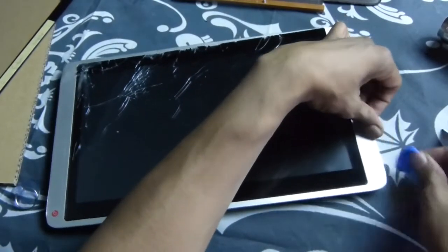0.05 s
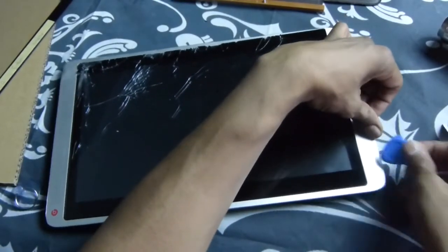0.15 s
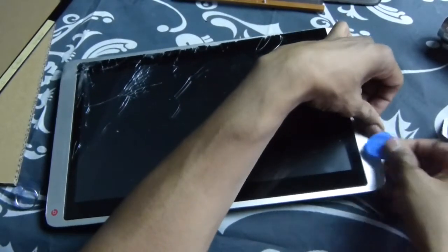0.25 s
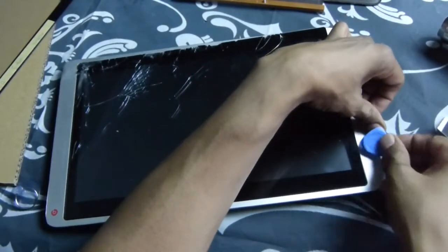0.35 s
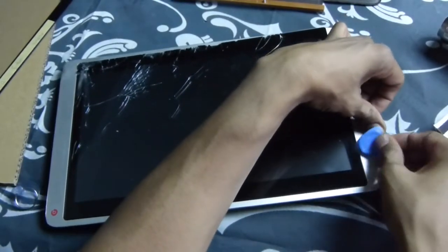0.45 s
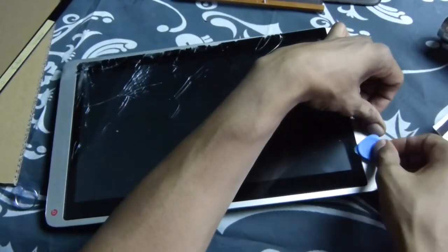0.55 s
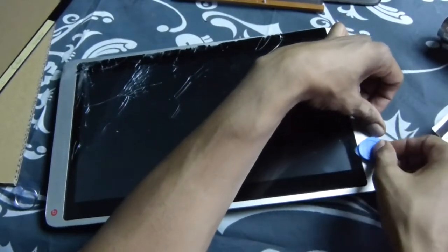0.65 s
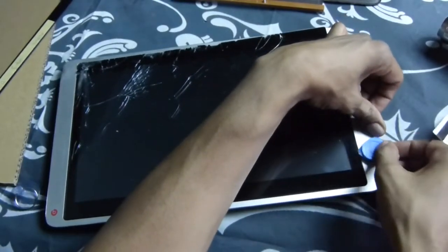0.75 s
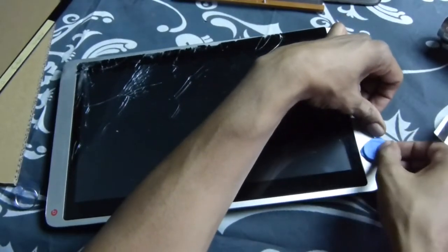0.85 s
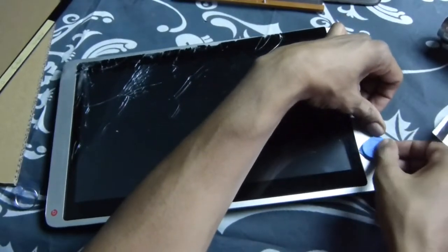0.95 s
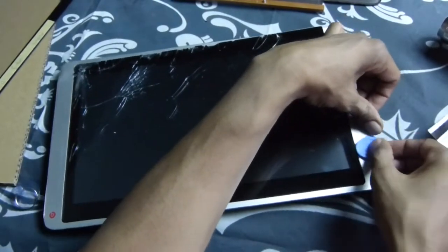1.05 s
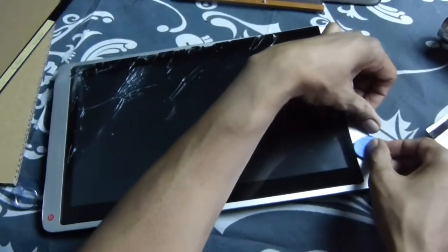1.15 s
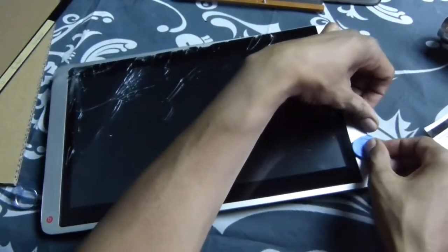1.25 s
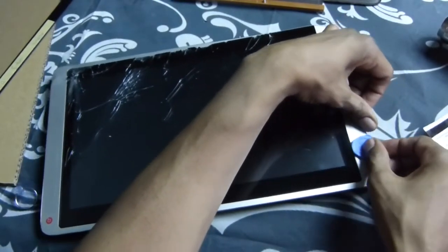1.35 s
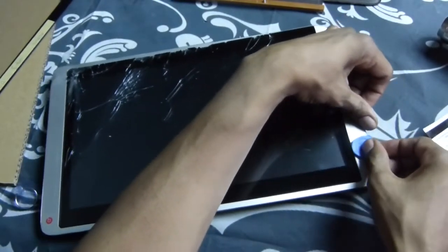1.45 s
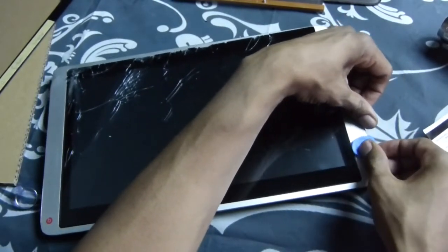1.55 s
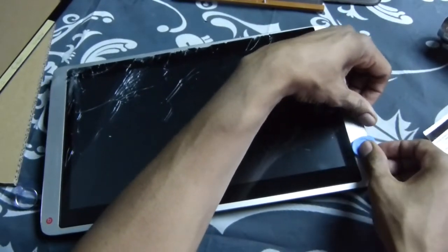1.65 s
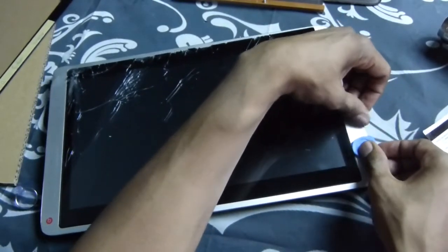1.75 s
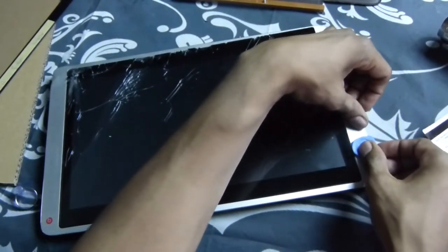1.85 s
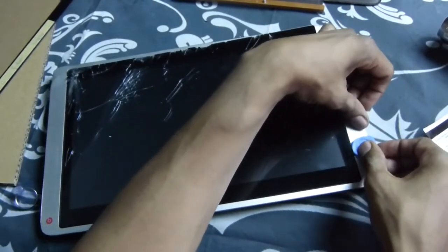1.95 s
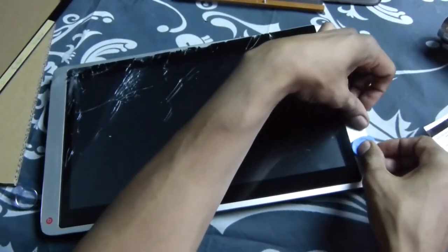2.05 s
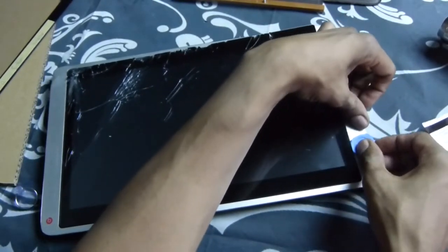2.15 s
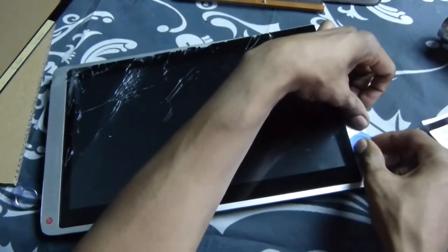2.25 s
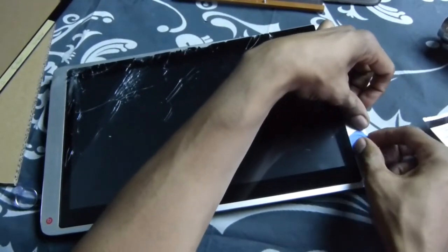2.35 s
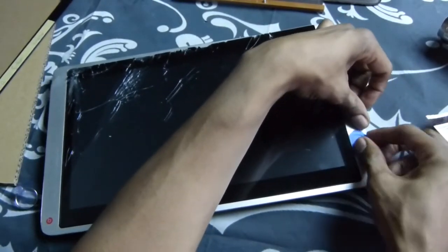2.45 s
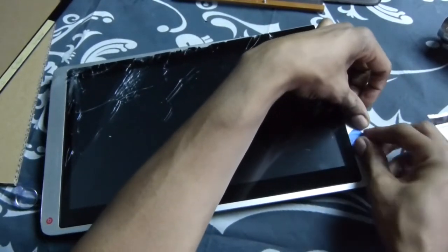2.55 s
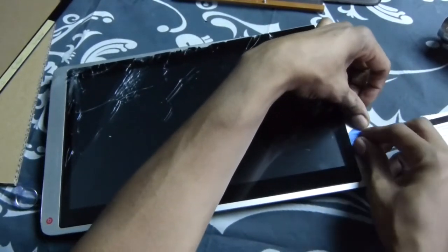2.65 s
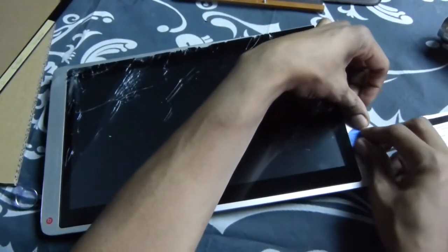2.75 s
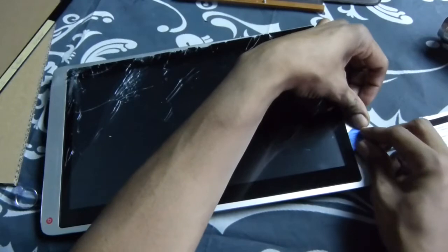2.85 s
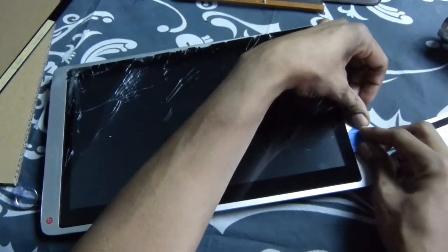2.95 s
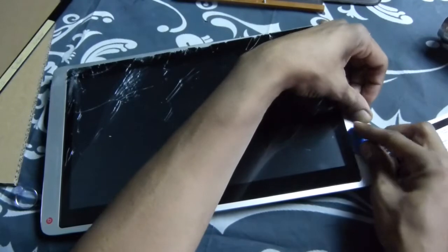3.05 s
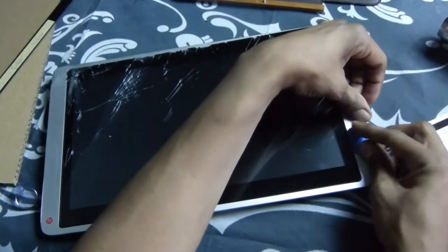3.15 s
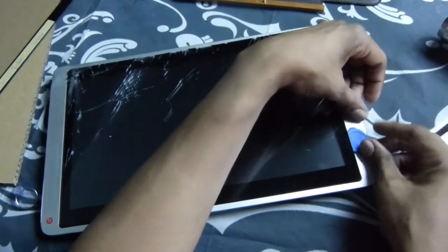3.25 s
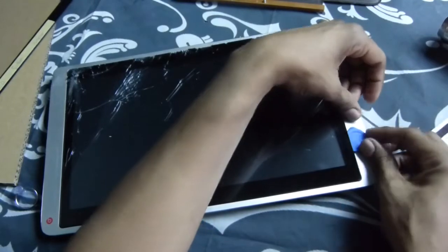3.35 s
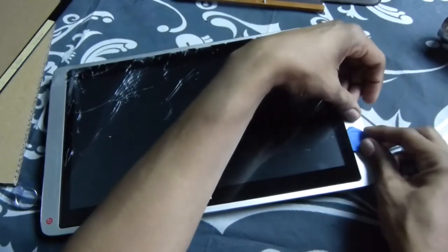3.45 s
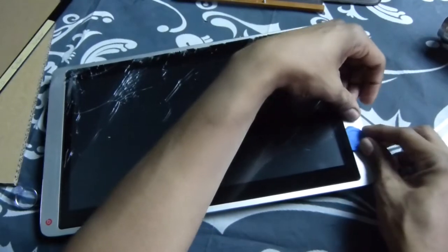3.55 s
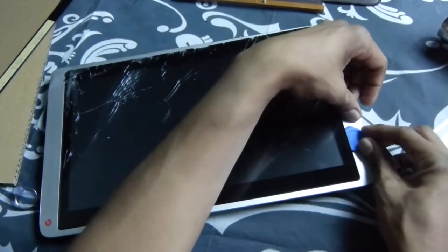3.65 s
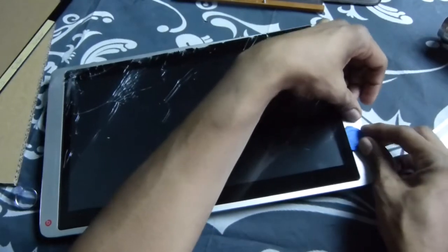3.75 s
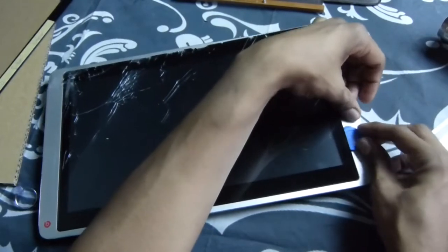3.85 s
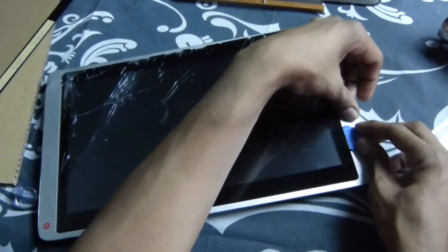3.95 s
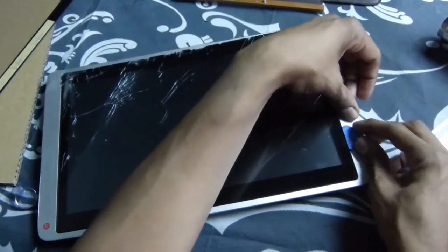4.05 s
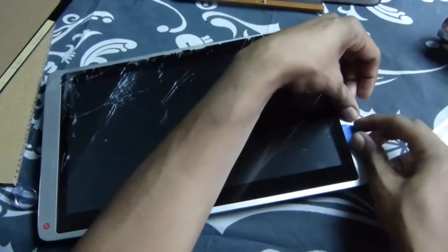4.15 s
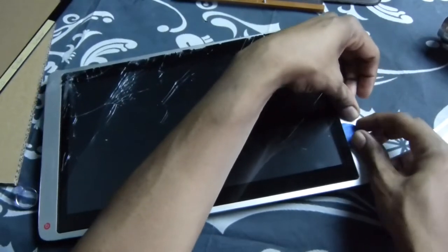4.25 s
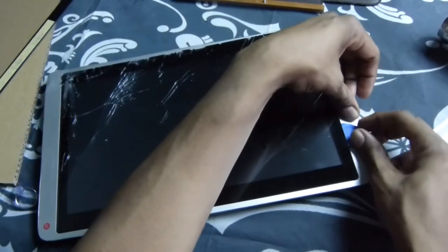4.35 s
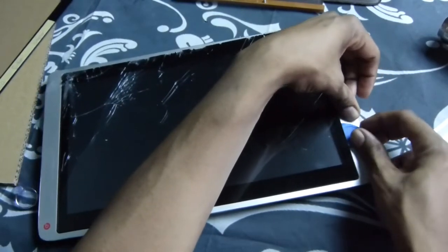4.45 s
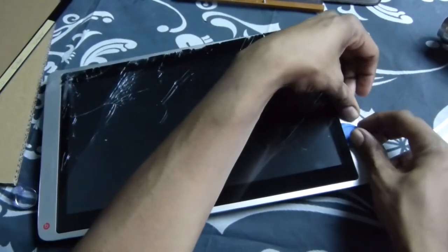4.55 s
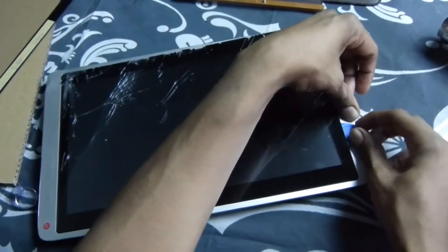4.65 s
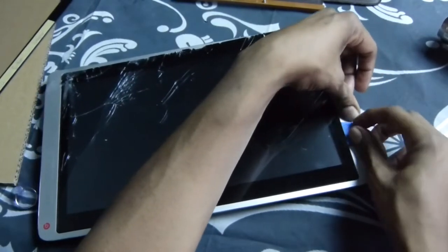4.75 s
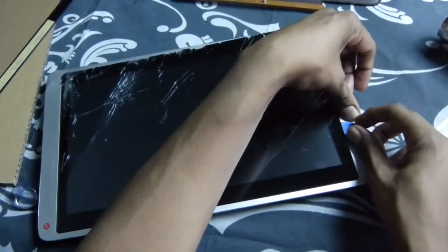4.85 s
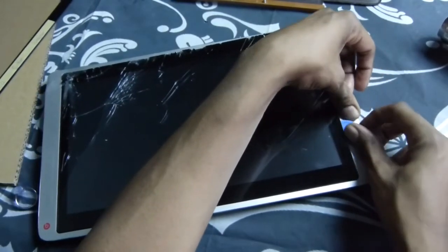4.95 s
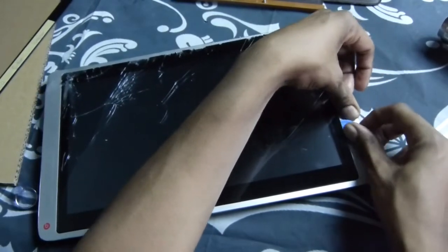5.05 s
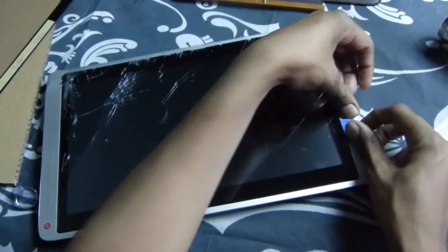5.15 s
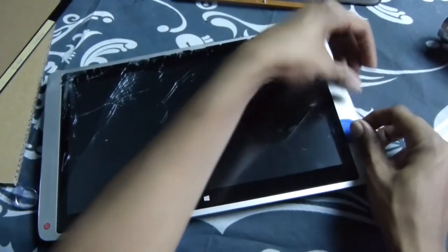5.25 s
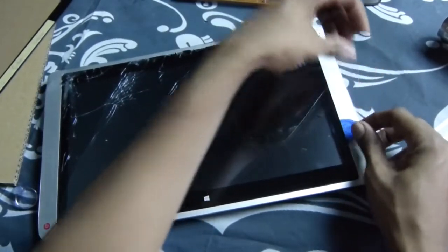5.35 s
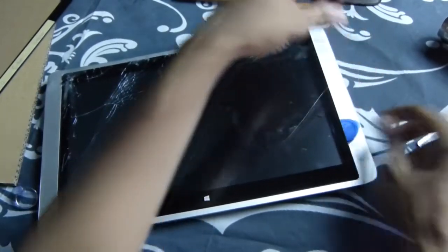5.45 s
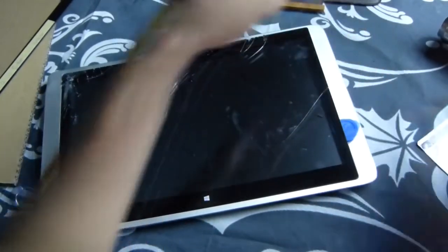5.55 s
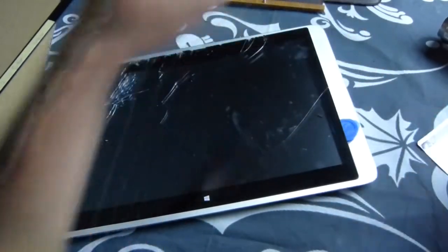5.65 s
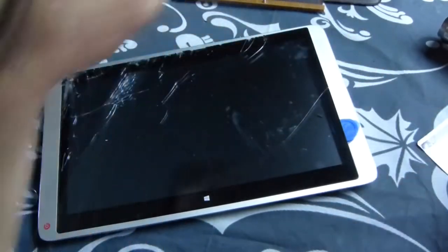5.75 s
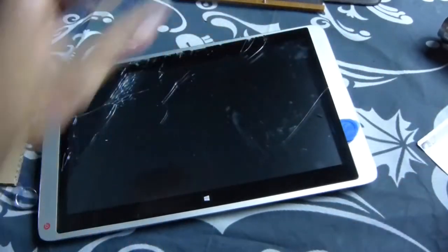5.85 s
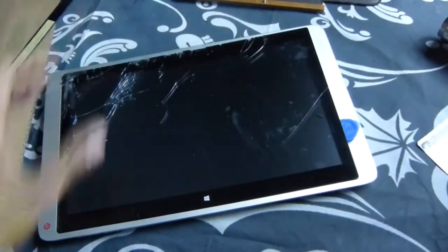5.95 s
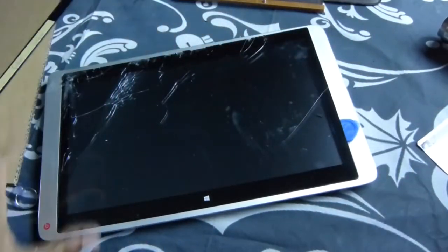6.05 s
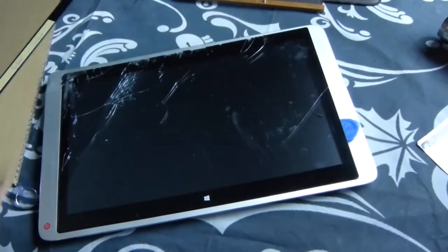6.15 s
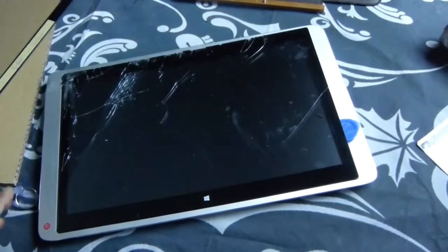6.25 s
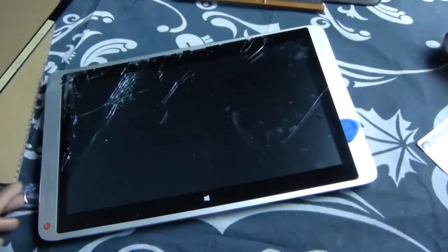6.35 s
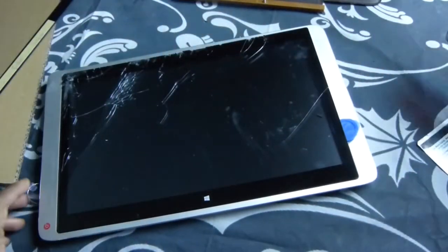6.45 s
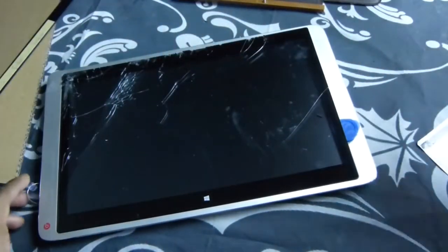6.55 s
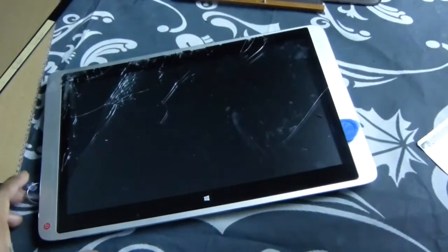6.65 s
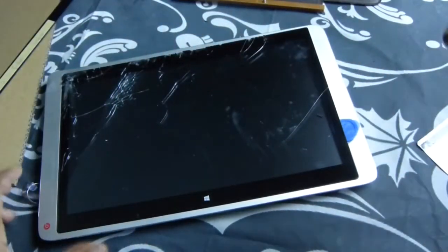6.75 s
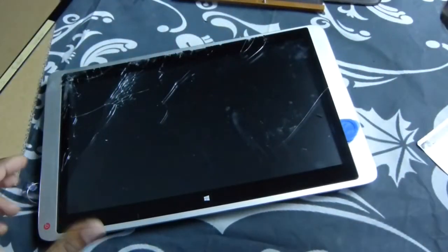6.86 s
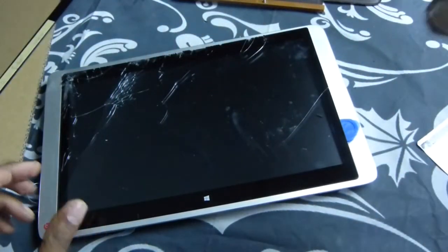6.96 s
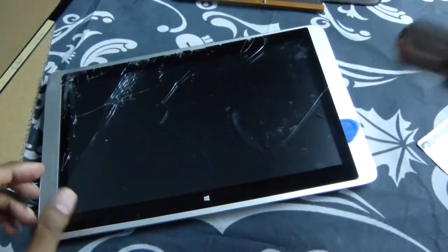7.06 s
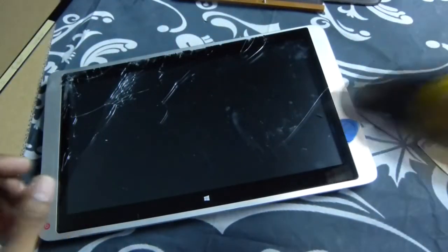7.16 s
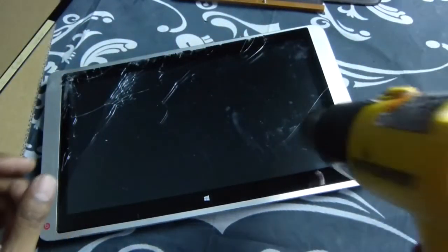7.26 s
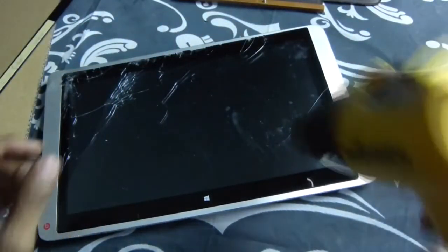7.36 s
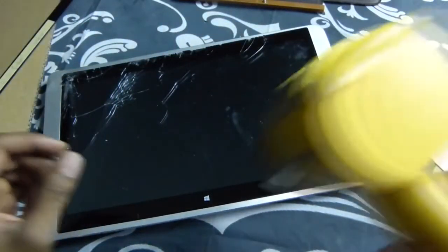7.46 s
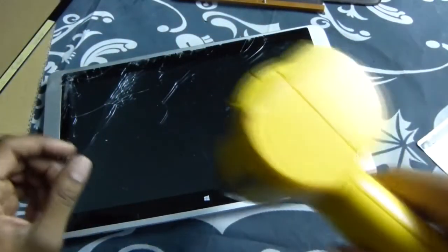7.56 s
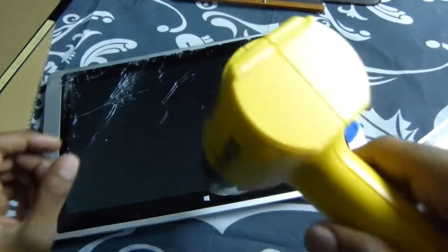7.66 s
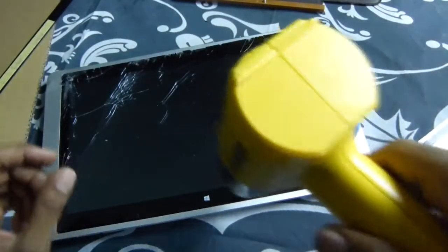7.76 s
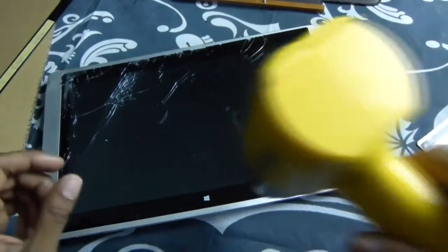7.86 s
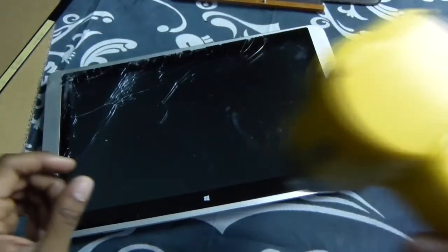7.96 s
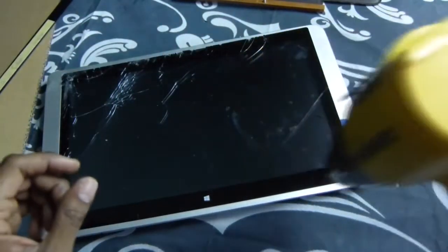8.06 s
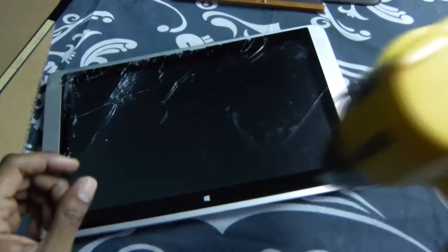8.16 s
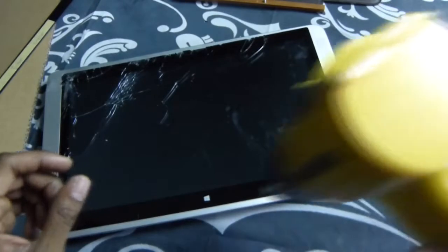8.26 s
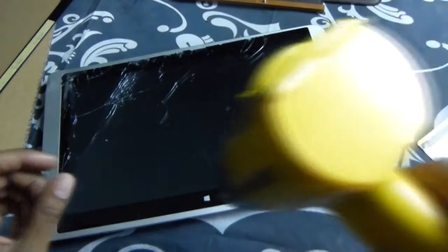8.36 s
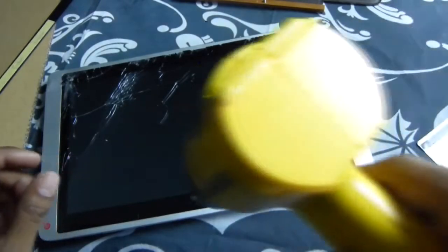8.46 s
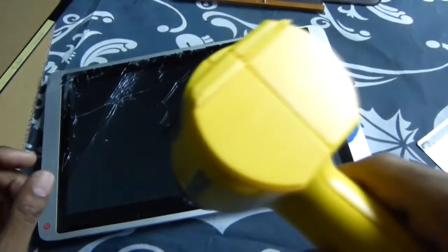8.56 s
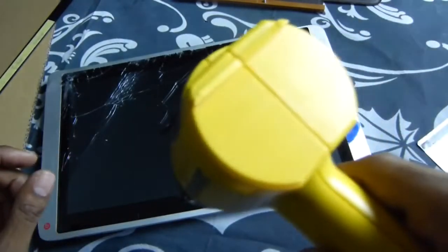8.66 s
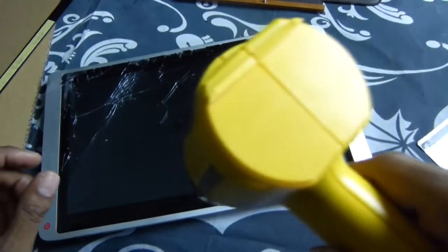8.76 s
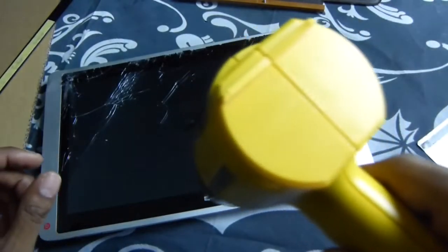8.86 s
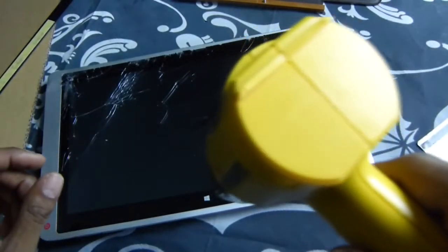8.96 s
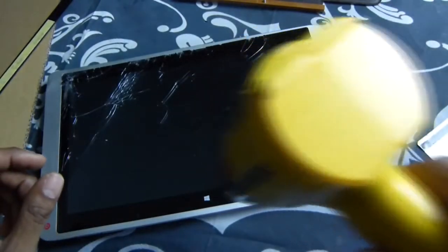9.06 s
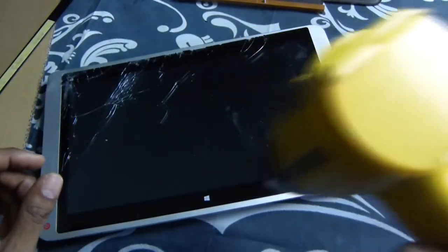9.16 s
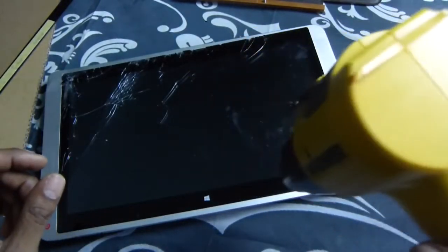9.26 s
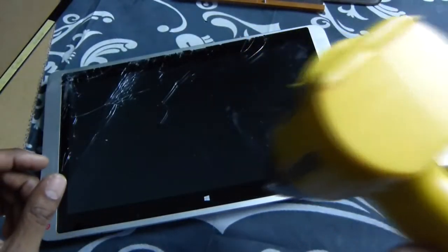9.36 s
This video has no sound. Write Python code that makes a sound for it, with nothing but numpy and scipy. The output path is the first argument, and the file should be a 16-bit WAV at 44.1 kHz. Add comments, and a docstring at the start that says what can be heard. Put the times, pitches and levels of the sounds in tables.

```python
"""Hands pry at a tablet's edge with a plastic pick in a small quiet room: dying noise bursts, coloured by
the struck body, make taps and snaps; grains of noise make rubbing, and sparse ticks make creaks.
Later knocks are duller and come from a metal tool and a heat gun being picked up. The gun is switched on
and swept over the glass: its fan's filtered noise roars through the casing resonances, and sine partials
on high multiples of the turning rate make the small motor whine."""
import sys
import numpy as np
from scipy import signal
from scipy.fft import rfft, irfft
from scipy.io import wavfile

SR = 44100
rng = np.random.default_rng(int(sys.argv[2]) if len(sys.argv) > 2 else 0)


def unload_audio(sound):
    """Save the sound as a 16-bit wav file, at the path given as the first command line argument."""
    columns = np.transpose(np.atleast_2d(sound))
    # keep every value between -1 and 1, then stretch to whole-number steps
    steps = np.round(np.clip(columns, -1, 1) * 32767)
    wavfile.write(sys.argv[1], SR, steps.astype(np.int16))


N = 414540

# the gun's sweep to and fro: start_s, position (0 = over the glass, 1 = out at the right edge)
SWEEP = [(7.5, 0.15), (7.65, 0.65), (7.92, 0.64), (8.1, 0.63), (8.36, 0.64), (8.5, 0), (8.9, 0.045),
         (9.12, 0.31), (9.36, 0.56)]
# spectrum of the air blast: frequency_hz, relative density_db (per Hz)
AIR_SPECTRUM = [(53, -89), (90, -28), (424, -16), (697, -5.5), (828, -10.5), (1120, -2), (1610, -11.5),
                (2590, -10), (3150, -20), (4350, -18), (5060, -14), (5630, -8), (6690, -16), (12500, -20),
                (15500, -34)]
# left-right likeness of air and rubbing: frequency_hz, correlation
NEAR_CORRELATION = [(60, 0.95), (180, 0.75), (550, 0.82), (1650, 0.95), (4970, 0.95), (15000, 0.74)]


def from_db(db):
    """Decibels to amplitude: 20 dB is a factor of ten."""
    return 10 ** (np.asarray(db) / 20)


def rms_one(x):
    """Normalise the mean power: scale to unit rms."""
    return x / np.sqrt(np.mean(x ** 2) + 1e-20)


def in_time(rows):
    """Linear interpolation of a time table's columns at every sample."""
    s, *columns = np.transpose(rows)
    return np.array([np.interp(np.arange(N) / SR, s, c) for c in columns])


def at_hz(points, hz):
    """Interpolation along log frequency, the scale of musical pitch."""
    points_hz, values = np.array(points).T
    return np.interp(np.log(hz), np.log(points_hz), values)


def drift(rate_hz, size):
    """Slow random fluctuation: low-passed white noise of unit rms, computed on every 40th sample."""
    pole = np.exp(-2 * np.pi * rate_hz * 40 / SR)
    white = rng.standard_normal(size // 40 + 2002)
    slow = signal.lfilter([1], [1, -2 * pole, pole * pole], white)[2000:]
    return np.interp(np.arange(size) / 40, np.arange(len(slow)), rms_one(slow))


def stereo(spectrum, correlation, mid, side, modes=()):
    """Mid-side principle: the power shares of sum and difference set the left-right correlation."""
    hz = np.maximum(np.fft.rfftfreq(len(mid), 1 / SR), 1)
    gain = from_db(at_hz(spectrum, hz))
    for centre_hz, width_hz, lift_db in modes:
        peak = 1 / (1 + (2 * (hz - centre_hz) / width_hz) ** 2)
        gain = gain * (1 + (from_db(lift_db) - 1) * peak)
    c = np.clip(at_hz(correlation, hz), -1, 1)
    m = gain * np.sqrt(1 + c) * rfft(mid)
    s = gain * np.sqrt(1 - c) * rfft(side)
    return rms_one(irfft(np.array([m + s, m - s]), len(mid)))


def room(x, wet_db, alike=0.75):
    """Reverberation as exponentially dying noise in octave bands, partly shared between the ears."""
    # reverberation time: frequency_hz, t60_s
    decay_times = [(200, 0.34), (1100, 0.23), (2500, 0.3), (8000, 0.26), (15000, .15)]
    first_wall_s = 0.005  # the response builds up over this time
    t = np.arange(SR // 2) / SR
    tail = 0
    for hz in 125 * 2. ** np.arange(7):
        white = rng.standard_normal((3, len(t)))
        octave = signal.butter(2, [hz / np.sqrt(2), hz * np.sqrt(2)], "band", fs=SR, output="sos")
        tail = tail + signal.sosfilt(octave, white) * from_db(-60 * t / at_hz(decay_times, hz))
    tail *= np.clip(t / first_wall_s, 0, 1) ** 2
    alike = np.clip(alike, 0, 1)
    ears = np.sqrt(alike) * tail[0] + np.sqrt(1 - alike) * tail[1:]
    ears /= np.sqrt(np.mean(np.sum(ears ** 2, axis=1)))  # unit energy
    mono = x.mean(axis=0, keepdims=True) if x.ndim > 1 else x[None]
    return from_db(wet_db) * signal.fftconvolve(mono, ears, axes=1)[:, :N]


def room_tone():
    """Stationary filtered noise: a low murmur and hiss with faint narrow bands and one thin sine tone."""
    # the still room: frequency_hz, relative density_db (per Hz)
    tone_spectrum = [(15, -59), (25, -29), (175, -8), (263, -10.5), (439, -5.5), (560, -6), (624, -10),
                     (754, -8), (2690, -25), (5140, -22.5), (14800, -26.5), (16000, -60)]
    # left-right likeness: frequency_hz, correlation
    tone_correlation = [(60, 1), (180, 0.28), (550, -0.41), (1650, -0.069), (4970, 0.43), (15000, 0.61)]
    # faint steady whistles and murmur: centre_hz, width_hz, lift_db
    tone_bands = [(5022, 12, 12), (5255, 14, 10), (375, 75, 2)]
    tone_db, whistle_hz, whistle_db = -55, 5197, -75
    breathe = from_db(0.6 * drift(3, N))
    white = rng.standard_normal((2, N))
    noise = stereo(tone_spectrum, tone_correlation, *white, modes=tone_bands)
    whistle = np.sqrt(2) * from_db(whistle_db) * np.sin(2 * np.pi * whistle_hz * np.arange(N) / SR)
    return whistle + from_db(tone_db) * breathe * noise


def spin_lag(start):
    """First-order lag of a rotor run-up: 1 at switch-on, dying exponentially."""
    spin_up_s = 0.075
    return np.exp(-np.arange(N - start) / SR / spin_up_s)


def blast(start, patchy_db=0.73):
    """Turbulent air noise through casing resonances; speed and aim shift roar, middle and hiss."""
    # roar, middle and hiss: zone_hz, level_db (over the glass), lag_db (down at switch-on), edge_db (gained)
    zones = [(860, -22.5, 16.5, -2), (2310, -24, 31, -3.5), (5600, -28.5, 9, 1)]
    # casing resonances: centre_hz, width_hz, over_db (over the glass), edge_db (out at the edge)
    casing_modes = np.array([(742, 32, 6.5, 5), (927, 40, 10, 12), (1108, 13, 10.5, 6.5), (1271, 46, 11, 2),
                             (1817, 26, 8.5, 10.5), (2077, 89, 5, 9), (2620, 200, 11, 2.5),
                             (3810, 450, 11, 14), (4680, 160, 5.5, 2), (9760, 420, 11, 1),
                             (12400, 140, 6, 0)])
    size = N - start
    white = rng.standard_normal((2, size))
    edge = np.clip(in_time(SWEEP)[0, start:], 0, 1)
    over = stereo(AIR_SPECTRUM, NEAR_CORRELATION, *white, modes=casing_modes[:, [0, 1, 2]])
    aside = stereo(AIR_SPECTRUM, NEAR_CORRELATION, *white, modes=casing_modes[:, [0, 1, 3]])
    air = over + edge * (aside - over)

    zone_hz, full_db, lag_db, edge_db = np.transpose(zones)[:, :, None]
    levels_db = full_db - lag_db * spin_lag(start) + edge_db * edge
    spectrum = rfft(air)
    hz = np.maximum(np.fft.rfftfreq(size, 1 / SR), 1)
    centres = np.log(np.geomspace(60, 15000, 17))
    out = 0
    for k, centre in enumerate(centres):
        # overlapping bands that add up to one, each with its own flutter
        share = np.interp(np.log(hz), centres, np.arange(17) == k)
        weights = [np.interp(centre, np.log(zone_hz[:, 0]), np.arange(3) == j) for j in range(3)]
        band_db = np.dot(weights, levels_db) + patchy_db * drift(14.0, size)
        out = out + irfft(spectrum * share, size) * from_db(band_db)
    return out


def whine(start, waver_db=1.8, faint_waver_db=5.0):
    """Fourier series of a motor that repeats every turn: partials on whole multiples of the rotor rate."""
    # strongest partials: order (multiple of the rotor rate)
    strong_orders = [74, 75, 76, 82, 83, 84, 88, 89, 90, 91, 92, 93, 94, 95, 118, 119, 136, 137]
    # the same partials over the glass: level_db (before resonances and whistle level)
    strong_levels = [-53.5, -46, -39.5, -63, -48, -57, -55, -38, -46, -61, -48, -38.5, -47.5, -44, -66,
                     -51.5, -51, -52.5]
    # the same partials: edge_db (gained out at the edge)
    strong_edge_gains = [13, 2.5, -5, 7, -3, 12, 12, -3, -3, 4, -1, -5, 6, 4, 0, 14.5, -6, -15]
    # narrow casing resonances the partials slide through: centre_hz, width_hz, lift_db
    slide_peaks = [(4650, 52, 10), (7336, 42, 16.5), (8480, 72, 13)]
    # change of the lowest strong partials: start_s, level_db
    low_whistle = [(7.45, -12), (7.55, 2), (7.76, -13), (7.95, -2.5), (8.17, -10.5), (8.4, 0), (8.85, 1.5),
                   (9.36, -1)]
    settled_turns, free_turns, spin_up_turns, wobble_turns = 61.87, 62.62, 15.5, 0.035  # turns per s
    sag_at_s, sag_s = 7.97, 0.16  # onset and time constant of the fall from free to settled speed
    whistle_top_hz, whistle_scatter = 4900, 0.12  # phases of low strong partials spread over 0.12 cycle
    faint_db = -44  # all other orders, added to the air's spectrum
    start_lag_db = 26  # how far the partials lie down at switch-on

    size = N - start
    lag = spin_lag(start)
    edge = in_time(SWEEP)[0, start:]
    unsagged = np.exp(-np.maximum(np.arange(start, N) / SR - sag_at_s, 0) / sag_s)
    rate = settled_turns + (free_turns - settled_turns) * unsagged
    rate = rate - spin_up_turns * lag + wobble_turns * drift(4.7, size)
    turns = np.cumsum(rate) / SR
    strong = dict(zip(strong_orders, zip(strong_levels, strong_edge_gains)))
    whistle_db = in_time(low_whistle)[0, start:]
    out = 0
    for order in range(50, 205):
        hz = order * settled_turns
        scatter = 1
        if order in strong:
            level_db, edge_db = strong[order]
            db = level_db + edge_db * edge + waver_db * drift(1.06, size)
            for peak_hz, width_hz, lift_db in slide_peaks:
                db = db + lift_db / (1 + (2 * (order * rate - peak_hz) / width_hz) ** 2)
            if hz < whistle_top_hz:
                db = db + whistle_db
                scatter = whistle_scatter  # nearly in step, so they throb once a turn
        else:
            db = at_hz(AIR_SPECTRUM, hz) + faint_db + faint_waver_db * drift(1.3, size)
        phase = order * turns + rng.random() * scatter
        out = out + np.sqrt(2) * from_db(db) * np.sin(2 * np.pi * phase)
    return out * from_db(-start_lag_db * lag)


def rubbing(grains_per_s=900, size_db=4.5, patchy_db=3.0, attack_share=0.31, release_s=0.045):
    """Stick-slip friction: each stroke is a run of tiny slips of uneven size that swells and fades."""
    # strokes of skin and plastic: start_s, length_s, bright_db, dull_db (nominal rub levels)
    strokes = [(0, 0.041, -47.5, -52.5), (0.064, 0.062, -47, -54.5), (0.152, 0.06, -46, -58),
               (0.262, 0.13, -50.5, -63), (0.448, 0.028, -51, -55.5), (1.092, 0.068, -32, -33.5),
               (1.186, 0.11, -42.5, -41.5), (1.31, 0.11, -33, -36), (1.421, 0.07, -37.5, -44),
               (2.22, 0.058, -54, -63.5), (2.36, 0.071, -59, -63.5), (2.52, 0.065, -61.5, -81),
               (2.646, 0.03, -57.5, -71), (2.992, 0.064, -54, -63.5), (3.093, 0.058, -52, -61),
               (3.324, 0.13, -60, -70), (3.44, 0.12, -58, -71), (3.618, 0.071, -35, -46),
               (3.962, 0.11, -53, -63), (4.183, 0.086, -56, -67), (4.94, 0.22, -66.5, -81),
               (5.874, 0.26, -55.5, -66.5), (6.122, 0.15, -48.5, -53.5), (6.289, 0.12, -46, -49),
               (6.39, 0.26, -47.5, -58), (6.693, 0.19, -57, -64), (7.265, 0.088, -56, -57)]
    # bright rub: frequency_hz, relative density_db (per Hz)
    bright_spectrum = [(1180, -30), (2000, -33), (3650, -53), (4050, -9), (4340, -7.5), (9580, -4),
                       (14500, -17.5), (16000, -24)]
    # dull rub: frequency_hz, relative density_db (per Hz)
    dull_spectrum = [(50, -58), (88, -20), (150, -6), (925, 3), (1190, -0.5), (1570, 4), (2300, 0),
                     (3500, 2), (4550, -2.5), (7700, -120)]
    # glue lets go in separate ticks under a dull stroke; their level is against the dull rub
    crackles_per_s, crackle_hz, crackle_db = 260, (1400, 6000), -4

    t = np.arange(0, N, 20) / SR  # the envelope moves in steps of 20 samples
    press = 0
    for s, length_s, bright_db, dull_db in strokes:
        rise = (t - s) / (attack_share * length_s)
        fall = (s + length_s - t) / release_s
        stroke = np.clip(np.minimum(rise, fall) + 0.5, 0, 1)
        press = press + stroke * from_db([[bright_db], [dull_db]])
    press = np.repeat(press, 20, axis=1)[:, :N]

    out = 0
    for level, spectrum in zip(press, (bright_spectrum, dull_spectrum)):
        sizes = from_db(size_db * np.minimum(rng.exponential(1, N), 3))
        slips = (rng.random(N) < grains_per_s / SR) * sizes
        grains = rng.standard_normal(N) * (0.49 + slips)  # slips over a smooth hiss
        side = rng.standard_normal(N) * grains.std()
        colour = stereo(spectrum, NEAR_CORRELATION, grains, side)
        out = out + level * from_db(patchy_db * drift(32, N)) * colour

    ticks = (rng.random(N) < crackles_per_s / SR) * rng.standard_normal(N)
    band = signal.butter(2, crackle_hz, "band", fs=SR, output="sos")
    ticks = signal.sosfilt(band, ticks + 1e-18)
    return out + from_db(crackle_db) * press[1] * rms_one(ticks)


def resonance(x, hz, width_hz):
    """Resonators in cascade: the same peak filter twice, for steep flanks."""
    b, a = signal.iirpeak(hz, hz / width_hz, fs=SR)
    return signal.lfilter(b, a, signal.lfilter(b, a, x))


def contact(white, edges_hz, t60, peak_db, rings=()):
    """Impact excitation: dying band noise heard close by, and a click of equal energy for the room."""
    n = np.arange(len(white))
    both = np.array([white * from_db(-60 * n / SR / t60), n == 0])
    both = signal.sosfilt(signal.butter(3, edges_hz, "band", fs=SR, output="sos"), both)
    both = both + sum(from_db(db) * resonance(both, hz, width_hz) for hz, width_hz, db in rings)
    both[1] = rms_one(both[1]) * both[0].std()
    return from_db(peak_db) * both / np.abs(both[0]).max()


def taps():
    """Impact and modal ringing: a bright snap plus a body ring, some with a thud; gives (close, room feed)."""
    # taps and snaps: start_s, snap_peak_db, body_peak_db, brightest_hz, focus_db (that pitch), left_right_db
    blows = [(0.1628, -28, -43, 10900, 23, -5), (0.193, -28.5, -49, 10700, 15, -7),
             (0.2408, -29, -67, 11100, 20, -3), (0.2768, -21.5, -63, 10700, 27, -4),
             (0.3217, -29.5, -52, 8250, 15, -7), (0.3426, -28, -51, 8800, 12, -1),
             (0.453, -31.5, -47, 6140, 14, 0), (0.5558, -35.5, -27.5, 2680, 11, 3),
             (0.8353, -35, -53, 9620, 4, -5), (0.9461, -3.5, -8, 4700, -11, 2),
             (1.084, -11.5, -28, 10700, 0, 2.5), (1.0923, -16, -39, 8280, -3, -1),
             (1.1002, -10.5, -28, 2620, 8, -3), (1.115, -9.5, -23.5, 2580, 5, 3),
             (1.1259, -15, -38, 1880, 11, -2), (1.1345, -11.5, -28, 2550, 12, 1),
             (1.1404, -16.5, -35, 2770, 11, 0), (1.2032, -16.5, -38, 2600, 6, 0),
             (1.238, -24, -48, 2600, 18, 0), (1.2607, -18.5, -43, 2650, 0, -.6),
             (1.285, -10, -28.5, 2550, 4.5, 2), (1.2989, -14.5, -42, 2580, 6, 0),
             (1.3208, -17, -45, 2600, 11, -8), (1.3311, -9.5, -21.5, 2480, 16.5, 4),
             (1.3485, -11.5, -35, 2480, 9.5, -9), (1.3715, -12, -36, 2700, 10, -1),
             (1.3814, -15, -40, 4010, 1, 0), (1.3968, -13.5, -46, 3000, 4, -1),
             (1.4408, -11.5, -28, 3350, 5, -4), (1.4474, -13, -32.5, 7950, -17, 3),
             (1.759, -26, -23, 3430, 2, 0), (2.7871, -35.5, -62, 9600, 14, 1),
             (2.9927, -22, -59, 10500, 30, -3), (3.1004, -29, -49, 9650, 12, -3),
             (3.3614, -32, -53, 8300, 20, -.6), (3.4432, -30.5, -49, 5150, 4, -6),
             (3.5142, -27, -64, 6900, -13, -4), (3.592, -33, -44, 8560, -4, 0),
             (3.6202, -20.5, -41, 9350, -7, -3), (3.643, -7.5, -33, 8700, -11, -.6),
             (3.907, -36.5, -54, 8400, 19, -1), (4.1978, -33.5, -47, 5630, 0, -.6),
             (4.8042, -28.5, -52, 8000, 5, 2), (4.9985, -21, -42.5, 8960, 12, 0),
             (5.0568, -31, -44, 7000, 6, -1), (5.1073, -39, -60, 8000, 12, -1),
             (5.2755, -31.5, -51, 8800, 12, 2), (5.3012, -10, -37, 9400, 17, 1.5),
             (5.3098, -26, -56, 8600, 17, 1), (5.359, -40, -60, 5000, 17, 0),
             (6.141, -38, -31.5, 4970, 11, -8), (6.3289, -26.5, -37, 6500, -2, -10),
             (6.3636, -18, -35, 10700, 2, -7), (6.4751, -17, -39, 7700, 8, 4),
             (6.558, -14, -39, 3160, -13, 6.5), (6.7998, -39, -48, 6900, -4, -12),
             (7.013, -30, -34.5, 4000, -9, -9), (7.0668, -23, -30.5, 6450, -7, -11.5),
             (7.2017, -29, -31.5, 5450, 4, -7), (7.2937, -14.5, -42, 4950, 4, 1),
             (7.3041, -11.5, -25.5, 10500, 15, -9)]
    # thuds through the bench: start_s, peak_db
    bench_thuds = [(0.945, -40), (1.139, -42), (1.326, -38), (1.441, -44), (1.756, -32), (2.194, -45),
                   (3.098, -50), (3.641, -47), (4.198, -45.5), (6.139, -35), (6.326, -39.5)]
    # the glass under a snap: centre_hz, width_hz, added_db
    glass_rings = [(1630, 310, 3), (4370, 2000, -6.5), (8000, 1130, -4.5)]
    # the tablet's body: centre_hz, width_hz, added_db
    tablet_rings = [(980, 32, 7), (1151, 22, 7), (1400, 36, 6)]
    # a metal tool's clink: centre_hz, width_hz, added_db
    clink_rings = [(1900, 250, 3), (7450, 380, 9), (9800, 600, 2)]
    # the gun's casing when knocked: centre_hz, width_hz, added_db
    knock_rings = [(760, 220, 3), (1403, 200, 4), (2050, 260, 7), (3300, 350, 8)]
    thud_hz, body_hz, snap_hz = (146, 610), (645, 1675), (1710, 11400)  # band edges
    thud_t60_s, body_t60_s, snap_t60_s, clatter_t60_s = 0.042, 0.007, 0.0065, 0.016
    hands_off_s = 6.0  # the hands leave the tablet: later knocks are blunter and further off
    tool_s, pick_up_s = 6.45, 6.9  # knocks are the tool's from the first, the gun's from the second
    snap_q = 1.98  # sharpness of a snap's brightest pitch
    snap_to_room_db = -8  # thin snaps reach the walls less than the body does

    size = 4096
    close, feed = np.zeros((2, N + size)), np.zeros(N + size)
    for (s, peak_db, body_db, hz, focus_db, pan_db), white in zip(blows, rng.standard_normal((len(blows), size))):
        t60, wet_db = clatter_t60_s, 0
        if s < hands_off_s:
            t60, wet_db, rings = snap_t60_s, snap_to_room_db, glass_rings
        elif s < tool_s:
            rings = []
        elif s < pick_up_s:
            rings = clink_rings
        else:
            rings = knock_rings
        snap = contact(white, snap_hz, t60, peak_db, [(hz, hz / snap_q, focus_db)] + rings)
        snap = snap * from_db([[0], [wet_db]])
        body_rings = tablet_rings if s < pick_up_s else knock_rings
        burst = snap + contact(white, body_hz, body_t60_s, body_db, body_rings)
        at = round(s * SR)
        close[:, at:at + size] += burst[0] * from_db([[pan_db / 2], [-pan_db / 2]])
        feed[at:at + size] += burst[1]
    for (s, peak_db), white in zip(bench_thuds, rng.standard_normal((len(bench_thuds), size))):
        burst = contact(white, thud_hz, thud_t60_s, peak_db)
        at = round(s * SR)
        close[:, at:at + size] += burst[0]
        feed[at:at + size] += burst[1]
    return close[:, :N], feed[:N]


def scene():
    """Superposition: handling and motor whine ring in the room; air and room tone lie around them."""
    motor_on_s = 7.32
    tap_wet_db, rub_wet_db, motor_wet_db = -2.5, -6.5, -17  # levels into the room
    start = round(motor_on_s * SR)
    motor, air = np.zeros((2, N)), np.zeros((2, N))
    air[:, start:] = blast(start)
    motor[:, start:] = whine(start)
    rub = rubbing()
    close, feed = taps()
    hands_to_room = from_db(tap_wet_db) * feed + from_db(rub_wet_db) * rub
    hands = close + rub + room(hands_to_room, wet_db=0.0, alike=0.73)
    return room_tone() + air + motor + room(motor, wet_db=motor_wet_db) + hands


def record(dry):
    """Band limiting: a steep low-pass removes what lies above 16300 Hz."""
    return signal.sosfilt(signal.cheby2(12, 70, 16300, fs=SR, output="sos"), dry)


dry = scene()
out = record(dry)
unload_audio(out)
```